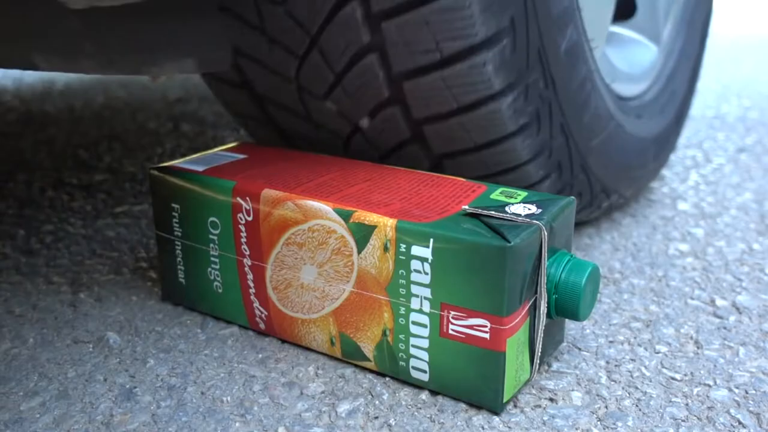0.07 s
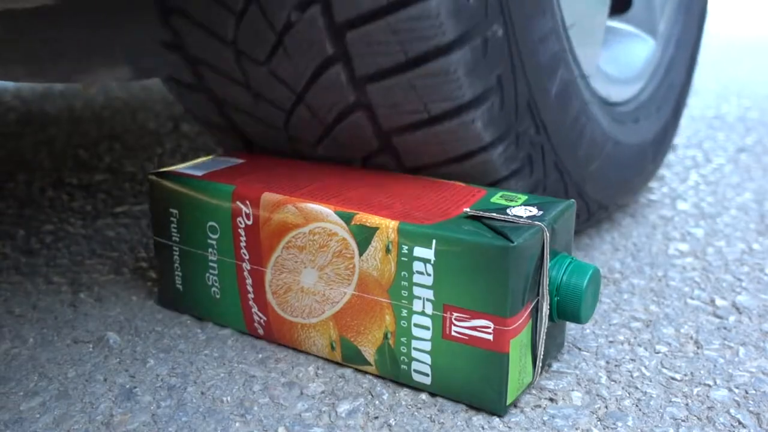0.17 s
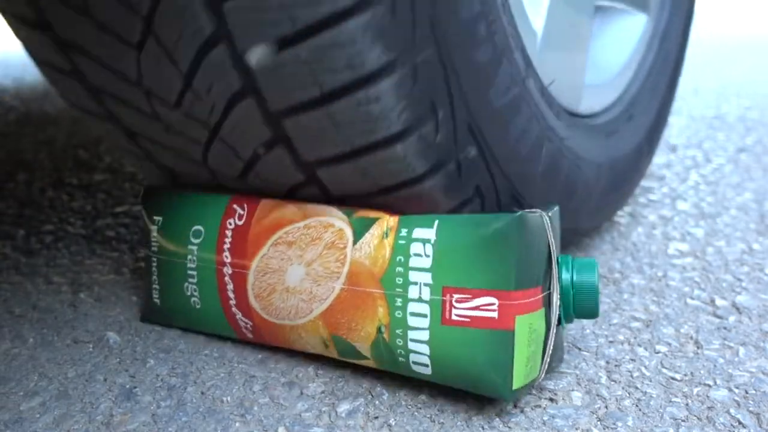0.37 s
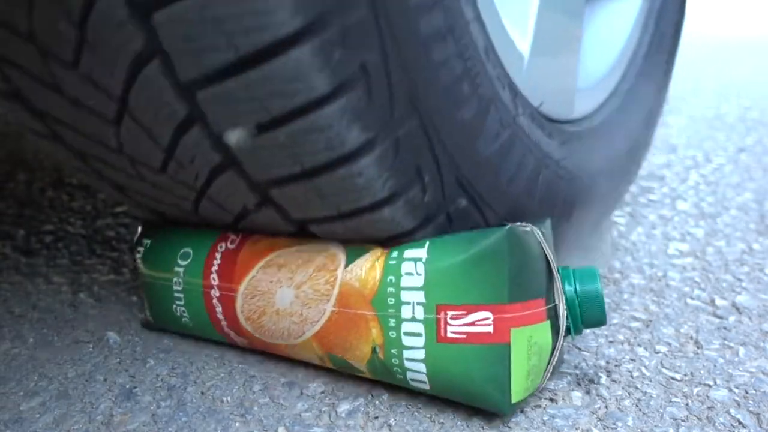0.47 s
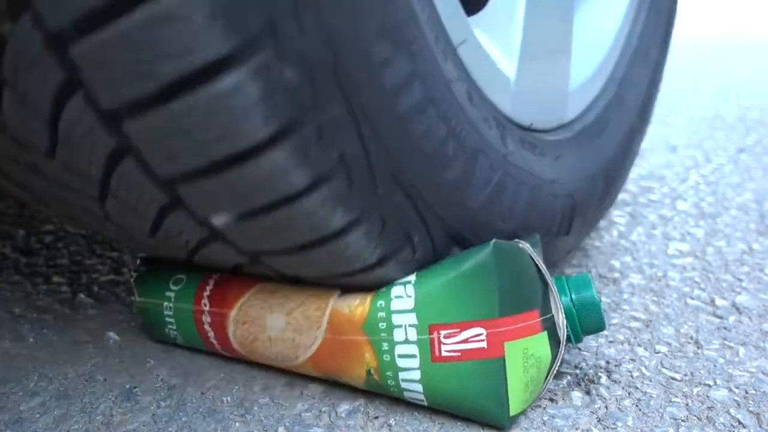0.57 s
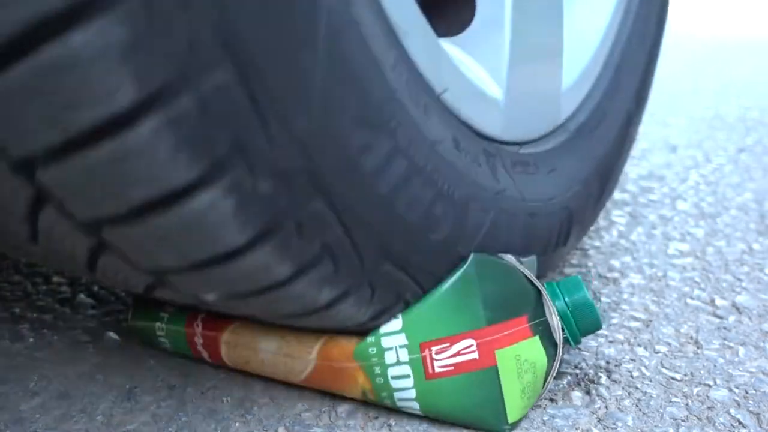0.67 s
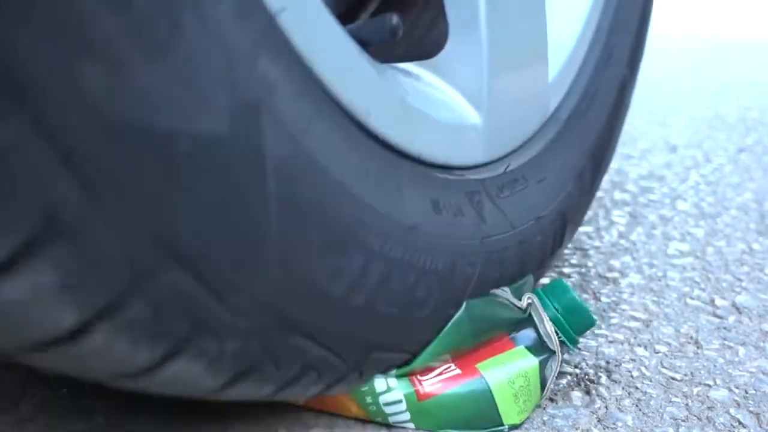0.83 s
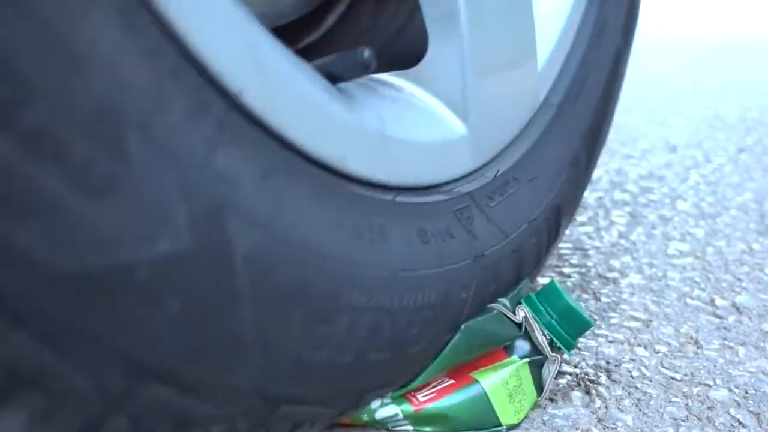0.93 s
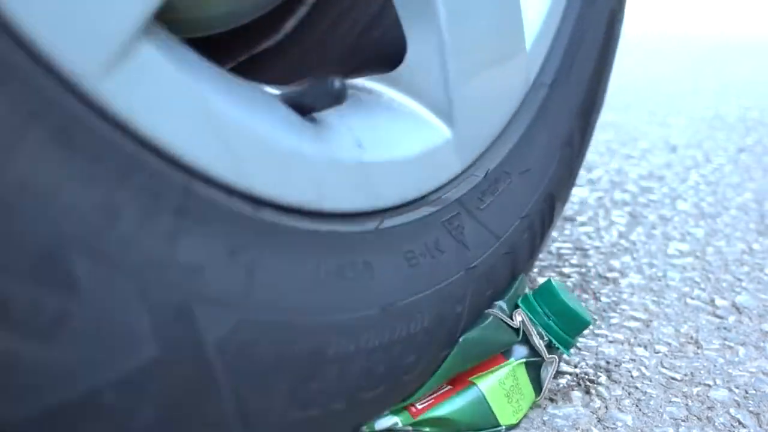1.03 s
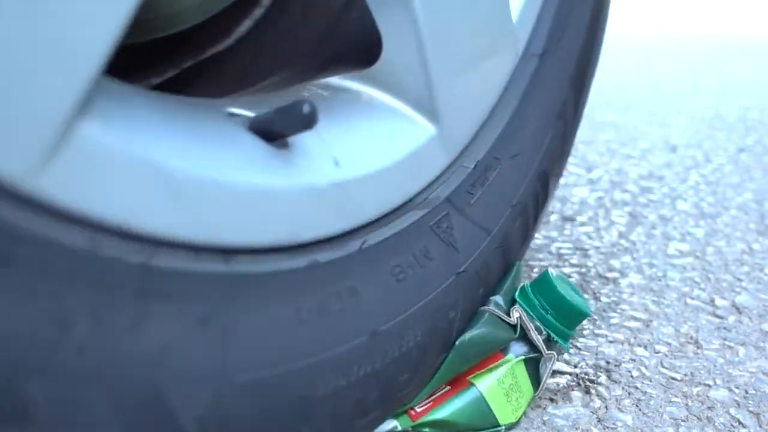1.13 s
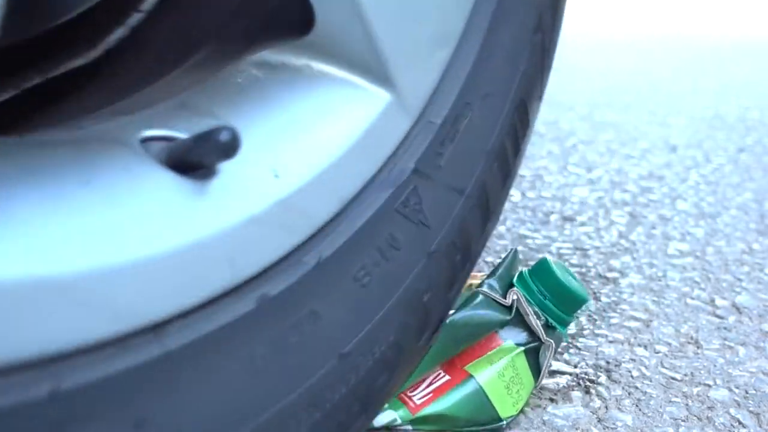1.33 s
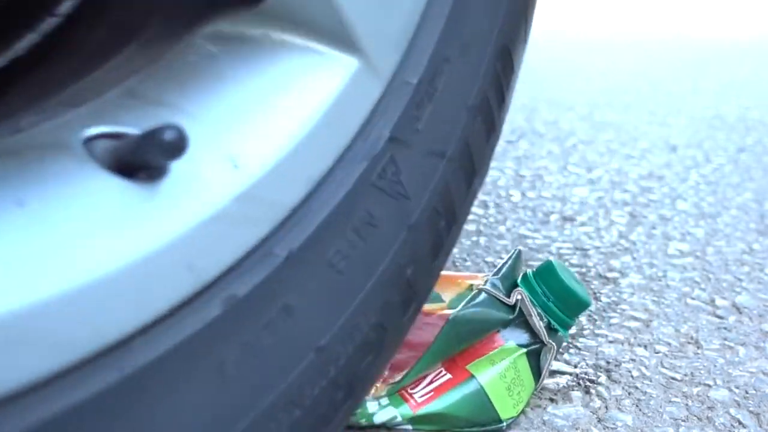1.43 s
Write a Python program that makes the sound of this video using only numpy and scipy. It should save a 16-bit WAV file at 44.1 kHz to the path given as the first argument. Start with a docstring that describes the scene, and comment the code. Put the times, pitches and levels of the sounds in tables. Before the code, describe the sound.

A full juice carton is crushed under a car tyre on asphalt, heard very close outdoors: rapid hollow pops and sharp cracks, a tearing burst, a bright whistling hiss, wet spurts, then a small snap.

```python
"""Over a car's idle rumble a tyre slowly loads a full juice carton on asphalt, heard from close by.
The damped walls buckle with hollow pops, noise bursts crack the creases, then a torn seam flaps.
Turbulent air and juice hiss out, with narrow, mostly falling whistles of gliding filtered noise.
Wet spurts and ringing bubbles end the jet; the cap snaps off, a sum of decaying modes.
Random grains of the tread crunch wet grit, and faint cracks and a last dull blow follow."""
import sys
import numpy as np
from scipy import signal
from scipy.fft import rfft, irfft
from scipy.io import wavfile
from scipy.ndimage import uniform_filter1d

SR = 44100
rng = np.random.default_rng(int(sys.argv[2]) if len(sys.argv) > 2 else 0)


def store_pcm(level_fs):
    """Save levels as 16-bit WAV."""
    pcm = np.round(np.clip(level_fs, -1, 1) * 32767).astype(np.int16)
    wavfile.write(sys.argv[1], SR, np.atleast_2d(pcm).T)


N = 66150
TIME = np.arange(N) / SR


def amp(db):
    """Level law: decibels to an amplitude ratio."""
    return 10 ** (np.asarray(db) / 20)


def unit(x):
    """Normalisation to an rms value of one."""
    return x / np.sqrt(np.mean(x ** 2) + 1e-20)


def read(points, hz):
    """Interpolation of a spectrum along a logarithmic frequency axis."""
    f, value = np.transpose(points)
    return np.interp(np.log(hz + 1), np.log(f + 1), value)


def curve(rows, t, axis=1):
    """Linear interpolation of one column of a control table at the times t."""
    rows = np.array(rows)
    return np.interp(t, rows[:, 0], rows[:, axis])


def add(mix, s, sound):
    """Superposition of a sound on the mix from time s, cut at the end."""
    part = mix[:, round(s * SR):][:, :sound.shape[-1]]
    part += sound[..., :part.shape[1]]


def pair(z, same):
    """Partial coherence: the second channel blends the first with an unrelated signal."""
    same = np.clip(same, -1, 1)
    return np.array([z[0], same * z[0] + np.sqrt(1 - same ** 2) * z[1]])


def pan(db):
    """Level difference between channels: half is added left and half taken right."""
    return amp(np.array([np.atleast_1d(db), -np.atleast_1d(db)]) / 2)


def high_pass(x, cut_hz):
    """Second-order removal of the bass."""
    return signal.lfilter(*signal.butter(2, cut_hz, "high", fs=SR), x)


def grains(per_s, spread_db):
    """Random impulse train: clicks of either sign and widely differing size."""
    hits = rng.random((2, N)) < per_s / SR
    signs = rng.choice([-1, 1], (2, N))
    sizes = amp(spread_db * np.minimum(rng.exponential(1, (2, N)), 4))
    return hits * signs * sizes


def swell(t, peak_s):
    """Damped response: an envelope that rises to one at peak_s and dies away."""
    u = t / peak_s
    return (u * np.exp(1 - u)) ** 2


# coherence of a near source: f/Hz, left-right likeness [0-1]
BODY_SAME = [(100, 0.99), (600, 0.91), (1500, 0.84), (4000, 0.66), (11000, 0.17)]


def colour(x, points, extra_db=0):
    """Spectral filtering of two channels, with the coherence of a near source."""
    hz = np.fft.rfftfreq(x.shape[-1], 1 / SR)
    spectrum = pair(rfft(x), read(BODY_SAME, hz))
    return unit(irfft(spectrum * amp(read(points, hz) + extra_db), x.shape[-1]))


# spectrum shared by all rasps, before their own resonance: f/Hz, relative level/dB
RASP_COLOUR = [(60, -30), (150, -7.5), (400, 6), (1000, 7), (3000, 1), (6000, -3.5), (11000, -8.5)]


def bursts(rows, octaves, skirt_db, rise_s, size=4096):
    """Transient excitation: brief noise rasps, each with one broad resonance over a flat skirt."""
    out, t, hz = np.zeros((2, N)), np.arange(size) / SR, np.fft.rfftfreq(size, 1 / SR)
    for s, db, centre_hz, decay_s in rows:
        distance = np.log2((hz + 1) / centre_hz) / octaves
        hump = np.exp(-.5 * distance ** 2) + amp(skirt_db)
        shape = (1 - np.exp(-t / rise_s)) * np.exp(-t / decay_s)
        noise = rng.standard_normal((2, size))
        rasp = colour(noise, RASP_COLOUR, 20 * np.log10(hump)) * shape
        # restoring the envelope's rms lets short bursts carry less energy
        add(out, s, amp(db) * unit(rasp) * np.sqrt(np.mean(shape ** 2)))
    return out


# spectrum of idling car and outdoor air: f/Hz, relative level/dB
IDLE = [(20, -12), (45, -11.5), (100, -2), (200, -6), (350, -14.5), (600, -9.5), (1000, -22), (3000, -22),
        (6000, -32), (11000, -37)]
# levels of idle and of tyre load, before the bass cut: t/s, idle level/dB, load level/dB
IDLE_LEVEL = [(0, -53, -60), (.12, -54, -46), (.2, -53.5, -45), (.3, -53, -26.5), (.4, -47, -45),
              (.55, -54, -72.5), (1.5, -55, -75)]


def idle():
    """Broadband noise: low rumble shaped by a spectrum and a slow level curve."""
    return amp(curve(IDLE_LEVEL, TIME)) * colour(rng.standard_normal((2, N)), IDLE)


# spectrum of the bass as the tyre loads the carton: f/Hz, relative level/dB
LOAD = [(20, 2.5), (45, -6.5), (90, -0.5), (130, -8), (250, -27), (1000, -59.5)]


def tyre_load():
    """Low-frequency forcing: bass noise grows as the tyre takes the load and then falls."""
    return amp(curve(IDLE_LEVEL, TIME, axis=2)) * colour(rng.standard_normal((2, N)), LOAD)


# tread on wet grit: t/s, level/dB
GRIT = [(.9, -75), (1.1, -50.5), (1.2, -63), (1.3, -63), (1.36, -52), (1.41, -47.5), (1.46, -55),
        (1.5, -56.5)]
# spectrum of the grit: f/Hz, relative level/dB
GRIT_COLOUR = [(60, -19.5), (300, -13), (900, -2), (1500, -1.5), (2000, 3.5), (2800, -5), (4300, -3),
               (5600, -18), (11000, -31)]


def grit():
    """Granular contact: dense random impacts crunch under the tread."""
    return amp(curve(GRIT, TIME)) * colour(grains(per_s=2500, spread_db=3.0), GRIT_COLOUR)


ECHO_DB, ECHO_T60_S, ECHO_DELAY_S = -15.5, 0.11, .004


def underbody(x, size=8192):
    """Short reverberation between asphalt and car: convolution with decaying noise."""
    t = np.arange(size) / SR
    tail = colour(rng.standard_normal((2, size)), [(60, 11), (500, 9.5), (3000, 6.5), (11000, 2)])
    tail *= (t > ECHO_DELAY_S) * amp(-60 * t / ECHO_T60_S)
    reflections = signal.fftconvolve(x, tail / np.linalg.norm(tail[0]), axes=1)[:, :N]
    return x + amp(ECHO_DB) * reflections


# small bubbles bursting in the last juice: t/s, level/dB
FROTH = [(.92, -78), (.968, -41.5), (1.01, -47.5), (1.05, -38.5), (1.09, -51.5), (1.17, -68), (1.29, -54.5),
         (1.36, -75)]
FROTH_LOW_HZ, FROTH_HIGH_HZ = 900, 2960
FROTH_CYCLES = 2.7  # cycles in which the decay falls to 1/e


def froth(count=14, size=1024):
    """Bubble resonance: tiny bubbles of many sizes each ring for a few cycles."""
    t, out = np.arange(size) / SR, np.zeros(N)
    for hz in np.geomspace(FROTH_LOW_HZ, FROTH_HIGH_HZ, count):
        envelope = (1 - np.exp(-hz * t)) * np.exp(-hz * t / FROTH_CYCLES)
        ring = np.sin(2 * np.pi * hz * t) * envelope
        pops = grains(per_s=45, spread_db=3.5)
        out = out + signal.oaconvolve(pops, ring[None], axes=1)[:, :N]
    return amp(curve(FROTH, TIME)) * unit(pair(out, 0.94))


# last juice through the slit: t/s, level/dB, resonance f/Hz, decay/s
SPITS = [(.969, -27, 1410, 0.0048), (.9795, -26, 1520, 0.0062), (.991, -31, 1800, 0.003),
         (1.006, -27.5, 2340, .004), (1.0185, -21.5, 1400, 0.001), (1.0275, -29, 990, 0.0035),
         (1.044, -34, 1200, 0.0092), (1.108, -42.5, 1200, 0.0049)]
SPIT_OCTAVES, SPIT_SKIRT_DB, SPIT_LOW_CUT_HZ = .5, -15, 520


def spits():
    """Intermittent outflow: thin, wet spurts of resonant noise through the flattened slit."""
    rasps = bursts(SPITS, SPIT_OCTAVES, SPIT_SKIRT_DB, rise_s=0.00033)
    return high_pass(rasps, SPIT_LOW_CUT_HZ)


# tones at the widening slit: t/s, length/s, start f/Hz, end f/Hz, bandwidth/Hz, level/dB
WHISTLES = [(0.605, .045, 10480, 10130, 400, -31), (0.637, 0.078, 8340, 7880, 242, -20),
            (0.647, 0.065, 7230, 7050, 300, -24), (0.683, 0.043, 6600, 5900, 450, -23.5),
            (0.704, 0.042, 9230, 8200, 900, -26), (0.724, 0.067, 6700, 6160, 383, -24),
            (.76, 0.091, 5830, 4740, 450, -26.5), (0.764, .05, 10870, 9850, 350, -34),
            (0.81, .038, 9950, 9200, 300, -28.5), (0.827, .042, 9120, 9850, 300, -30),
            (0.816, 0.069, 6200, 6200, 1295, -25.5), (0.878, 0.088, 4600, 3800, 810, -36.5)]
WHISTLE_SAME = 0.51  # left-right likeness


def whistles():
    """Edge-tone principle: narrow, breathy bands swell, glide and fade."""
    out = np.zeros((2, N))
    for s, length_s, from_hz, to_hz, width_hz, db in WHISTLES:
        u = np.linspace(0, 1, round(length_s * SR))
        a, b = rng.standard_normal((2, 2, N))
        low_pass = signal.butter(2, width_hz / 2, fs=SR)
        fuzz = signal.lfilter(*low_pass, pair(a + 1j * b, WHISTLE_SAME))[:, :len(u)]
        turns = np.cumsum(from_hz + (to_hz - from_hz) * u) / SR
        # a rotating carrier moves the narrow noise up to the gliding pitch
        tone = (fuzz * np.exp(2j * np.pi * turns)).real
        add(out, s, amp(db) * unit(tone) * np.sin(np.pi * u))
    return out


# the jet: t/s, level/dB, juice weight [0-1], left minus right/dB
JET = [(.44, -81, 0, -1), (.458, -41, 0.27, 5), (.487, -33.5, 0.46, -6), (.508, -21, 0.01, -1),
       (.54, -22.5, 0, -6), (.56, -26.5, 0.34, -2.5), (.582, -20.5, 0.17, -1), (.615, -24.5, 0.17, -2.5),
       (.68, -21, 0.21, -1.5), (.75, -20.8, 0.3, -2), (.85, -21.5, 0.39, -1.5), (.90, -28, 0.73, -1.5),
       (.96, -38, 0.77, -2), (1.06, -43.5, 0.54, 2), (1.10, -48, 0.66, 2), (1.17, -66.5, 1, 8),
       (1.25, -80.5, 0.93, -12.5)]
# spectrum of escaping air, before its weight: f/Hz, relative level/dB
AIR = [(50, -29.5), (300, -16), (700, -9.5), (1500, -8.5), (4000, -4), (6500, -3.5), (8200, -1.5),
       (11000, -0.4)]
# spectrum of juice spray, before its weight: f/Hz, relative level/dB
SPRAY = [(50, -28.5), (300, -17.5), (700, -1.5), (1500, 2), (2800, 5.5), (4500, 6), (6200, 1), (8000, -6.5),
         (11000, -14.5)]
# coherence of the jet: f/Hz, left-right likeness [0-1]
JET_SAME = [(100, 0.88), (1200, 0.92), (2600, 0.99), (5500, 0.47), (8000, 0.24), (11000, 0.068)]
JET_PATCH_DB, JET_FLICKER_DB = 2.5, 0.56  # rms of local and of overall fluctuation


def jet(size=256):
    """Turbulent jet noise: a fluctuating hiss that darkens as juice takes the place of air."""
    hop = size // 4
    t, hz = np.arange(N // hop + size) * hop / SR, np.fft.rfftfreq(size, 1 / SR)
    a, b = rng.standard_normal((2, 2, len(t), len(hz)))
    wet = curve(JET, t, axis=2)[:, None]
    gain = amp((1.5 - wet) * read(AIR, hz) + wet * read(SPRAY, hz))
    gain /= np.sqrt(np.mean(gain ** 2, axis=1, keepdims=True))
    patches = uniform_filter1d(rng.standard_normal(gain.shape), size=16, axis=0)
    patches = unit(uniform_filter1d(patches, size=4, axis=1))
    flicker = unit(uniform_filter1d(rng.standard_normal(len(t)), size=3))[:, None]
    fluctuation = amp(JET_PATCH_DB * patches + JET_FLICKER_DB * flicker)
    frames = pair(a + 1j * b, read(JET_SAME, hz)) * gain * fluctuation
    hiss = signal.istft(frames.transpose(0, 2, 1), nperseg=size, noverlap=size - hop)[1][:, :N]
    return unit(hiss) * amp(curve(JET, TIME))


FLAP_S, FLAP_LENGTH_S, FLAP_RISE_S, FLAP_HOLD_S = .4555, 0.059, 0.0035, 0.013
FLAP_DB, FLAP_FADE_DB_PER_S = -21, 370
FLAP_HZ = 465
FLAP_JITTER, FLAP_ROUGH = .06, 0.74  # rms share of the pitch; share of noise in the drive
# spectrum of the torn seam: f/Hz, relative level/dB
FLAP_COLOUR = [(40, -17), (120, -17), (220, -4.5), (450, -5.5), (900, -1.5), (1400, -6.5), (2000, -16.5),
               (3000, -16.5), (5000, -32.5), (11000, -49.5)]


def seam():
    """Flow-driven flutter: the torn lips slap together unevenly as the air breaks out."""
    t = np.arange(0, FLAP_LENGTH_S, 1 / SR)
    noise = rng.standard_normal((3, N))[:, :len(t)]
    wander = unit(uniform_filter1d(noise[2], size=120))
    turns = np.cumsum(FLAP_HZ * (1 + FLAP_JITTER * wander)) / SR
    slaps = unit(np.diff(np.floor(turns), prepend=0))  # one click a cycle
    breath = unit(noise[:2] * (.4 + np.exp(-(turns % 1) / 0.42)))
    drive = (1 - FLAP_ROUGH) * slaps + FLAP_ROUGH * breath
    fade_db = FLAP_FADE_DB_PER_S * np.maximum(t - FLAP_HOLD_S, 0)
    shape = np.minimum(t / FLAP_RISE_S, 1) * amp(FLAP_DB - fade_db)
    out = np.zeros((2, N))
    add(out, FLAP_S, shape * colour(drive - drive.mean(), FLAP_COLOUR))
    return out


SNAP_S, SNAP_DB, SNAP_PAN_DB, SNAP_LOW_CUT_HZ = 1.0754, -10, -2.5, 440
SNAP_TAIL_DB, SNAP_TAIL_S = -24.5, 0.0042
# modes of the cap, before the snap's own gain: f/Hz, relative level/dB, t60/s
CAP_MODES = [(583, -17, 0.0078), (860, -15, 0.018), (2800, -9.5, 0.0057), (3820, -5.5, .006),
             (5680, 2.5, 0.0032), (7660, -27, 0.0039)]


def cap_snap(size=4096):
    """Modal release: the cap gives way with one sharp click and a short rustle."""
    t, out = np.arange(size) / SR, np.zeros((2, N))
    click = sum(amp(db - 60 * t / t60) * np.sin(2 * np.pi * hz * t) for hz, db, t60 in CAP_MODES)
    add(out, SNAP_S, amp(SNAP_DB) * high_pass(click, SNAP_LOW_CUT_HZ))
    rustle = bursts([(SNAP_S, SNAP_TAIL_DB, 4500, SNAP_TAIL_S)], 0.75, -22, 0.00024)
    return (out + rustle) * pan(SNAP_PAN_DB)


# crumpling of the board: t/s, level/dB
CRUMPLE = [(.2, -95), (.214, -37.5), (.24, -38), (.29, -32), (.31, -38), (.35, -30), (.39, -40.5),
           (.445, -38), (.48, -97)]
# spectrum of the crumpling: f/Hz, relative level/dB
CRUMPLE_COLOUR = [(40, -10.5), (120, 3), (450, 3), (800, 1.5), (1600, -7), (4000, -9.5), (7000, -18.5),
                  (11000, -24.5)]


def crumple():
    """Crackling noise: dense random clicks of many sizes as the board crumples."""
    return amp(curve(CRUMPLE, TIME)) * colour(grains(per_s=3900, spread_db=4.0), CRUMPLE_COLOUR)


# taut board after big cracks: t/s, level/dB, f/Hz, time to peak/s
RINGS = [(.2800, -20, 1042, 0.0053), (.3600, -29, 1030, 0.0038), (.4590, -18, 903, 0.011),
         (1.2150, -44.5, 880, 0.0029)]


def rings(size=8192):
    """Free vibration: a stretched panel sings briefly at one pitch."""
    out, t = np.zeros((2, N)), np.arange(size) / SR
    for s, db, hz, swell_s in RINGS:
        add(out, s, amp(db) * swell(t, swell_s) * np.sin(2 * np.pi * hz * t))
    return out


# cracks of creases and folds: t/s, level/dB, resonance f/Hz, decay/s
CRACKS = [(.2150, -30.5, 2400, 0.0043), (.2490, -26, 3550, 0.0028), (.2660, -25, 2600, 0.0018),
          (.2795, -14.5, 2920, 0.0014), (.2812, -17.5, 970, 0.0056), (.3205, -19.5, 2430, 0.0017),
          (.3240, -22.5, 3000, 0.0014), (.3372, -25, 4000, 0.0017), (.3390, -9, 2510, .0018),
          (.3582, -19, 2700, 0.0014), (.3610, -28.5, 1000, 0.0034), (.3870, -32.5, 3500, 0.0044),
          (.3992, -28.5, 6430, 0.0015), (.4548, -15, 2530, 0.0018), (.5020, -20.5, 1700, 0.0012),
          (.5080, -21, 3250, 0.006), (1.186, -44, 2980, 0.0017), (1.2165, -47, 900, 0.0059),
          (1.2200, -47.5, 2400, 0.0037), (1.329, -47.5, 6000, 0.0035)]
CRACK_OCTAVES, CRACK_SKIRT_DB, CRACK_RISE_S = 0.38, -11.5, .00015


def cracks():
    """Transient release: creases and folds crack in brief resonant noise."""
    return bursts(CRACKS, CRACK_OCTAVES, CRACK_SKIRT_DB, rise_s=CRACK_RISE_S)


# wall buckles: t/s, level/dB, f/Hz, swell/s
BUCKLES = [(.2132, -7.5, 405, 0.003), (.2215, -8, 459, .003), (.2320, -12, 454, 0.0019),
           (.2405, -18.5, 430, 0.0065), (.2665, -6, 441, 0.0042), (.2790, -8, 520, 0.0018),
           (.2855, -17, 447, 0.0039), (.2945, -14, 443, 0.0056), (.3110, -21.5, 263, 0.0037),
           (.3232, -5, 400, .0019), (.3400, -6.5, 454, 0.0022), (.3575, -7.5, 400, 0.0034),
           (.3755, -19.5, 432, 0.0022)]
# dull blows as the carton gives way: t/s, level/dB, f/Hz, swell/s
PUFFS = [(.4542, -5.5, 553, 0.0014), (.4560, -27, 320, 0.003), (.4995, -12, 334, 0.0012),
         (.8105, -29.5, 245, 0.0024), (.8285, -20, 646, 0.00073), (1.481, -36.5, 247.6, 0.0027)]
# modes of the filled carton: multiple of the pitch, relative level/dB, length relative to the swell
WALL = [(1, -1, 0.94), (.44, -12, 1.3), (.24, -22, 1.3), (2.35, -30, 0.79)]


def walls(rows, size=4096):
    """Heavily damped modes: each blow swings the carton for a few cycles."""
    out, t = np.zeros((2, N)), np.arange(size) / SR
    for s, db, hz, swell_s in rows:
        for multiple, mode_db, length in WALL:
            mode = np.sin(2 * np.pi * hz * multiple * t)
            add(out, s, amp(db + mode_db) * swell(t, swell_s * length) * mode)
    return out


def scene():
    """Superposition: the carton reverberates under the car; jet, whistles and car stay direct."""
    board = crumple() + cracks() + rings() + walls(BUCKLES) + walls(PUFFS)
    carton = board + seam() + spits() + froth() + cap_snap()
    spray = (jet() + whistles()) * pan(curve(JET, TIME, axis=3))
    return underbody(carton) + spray + idle() + tyre_load() + grit()


LOW_CUT_HZ, EDGE_HZ = 120, 11080


def record(dry):
    """Band limitation: a gentle first-order bass cut and a steep upper edge."""
    thin = signal.sosfilt(signal.butter(1, LOW_CUT_HZ, "high", fs=SR, output="sos"), dry)
    edge = signal.firwin(401, EDGE_HZ, window=("kaiser", 7), fs=SR)
    return signal.oaconvolve(thin, edge[None], "same")


dry = scene()
out = record(dry)
store_pcm(out)
```